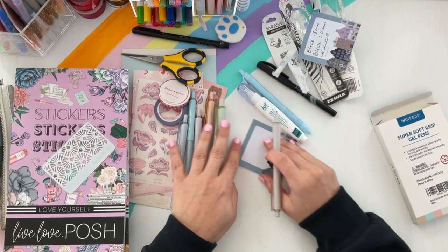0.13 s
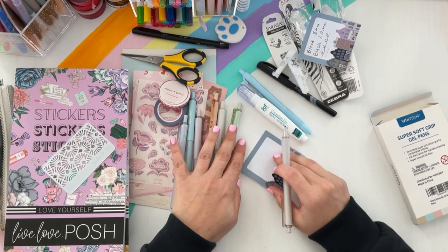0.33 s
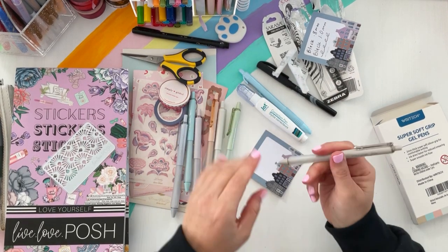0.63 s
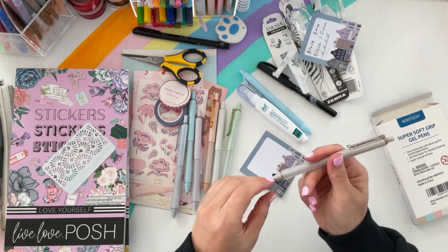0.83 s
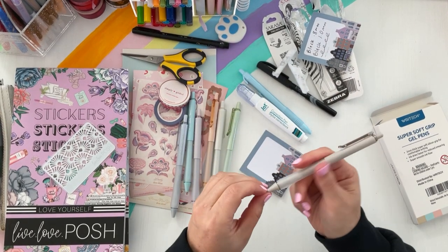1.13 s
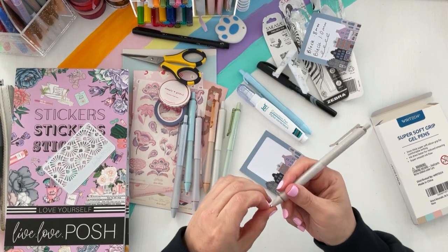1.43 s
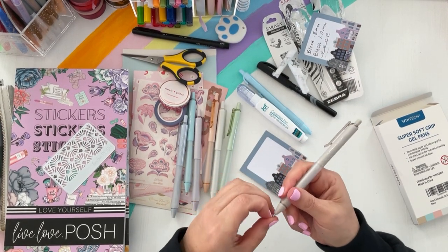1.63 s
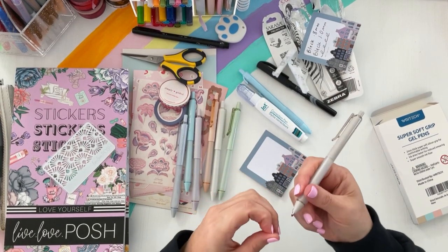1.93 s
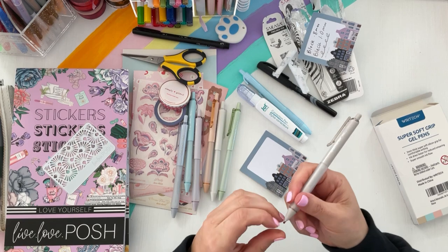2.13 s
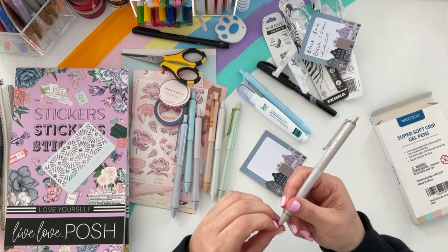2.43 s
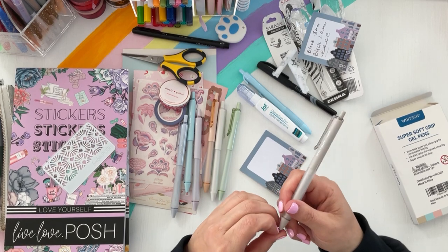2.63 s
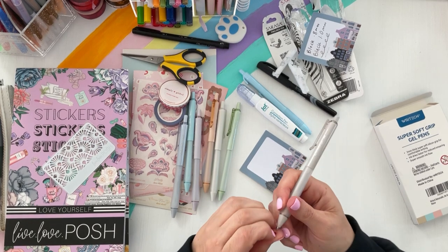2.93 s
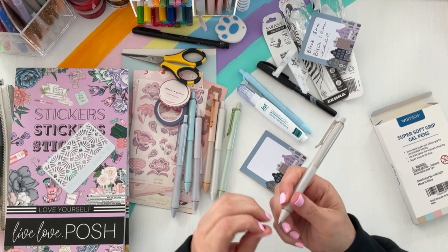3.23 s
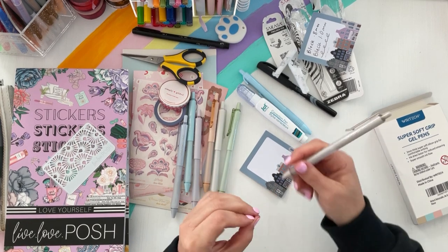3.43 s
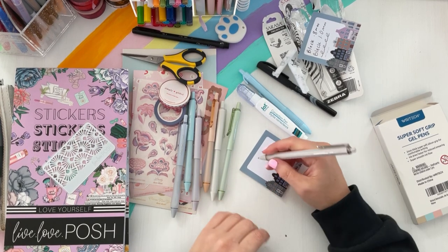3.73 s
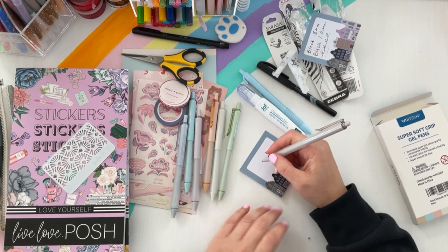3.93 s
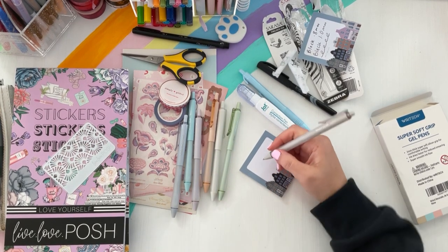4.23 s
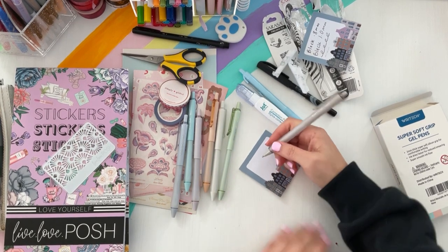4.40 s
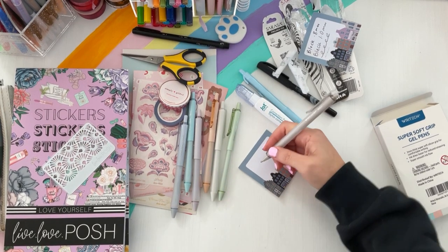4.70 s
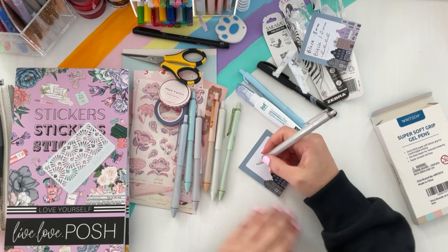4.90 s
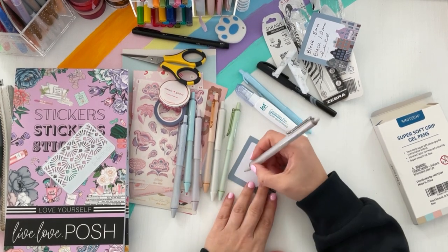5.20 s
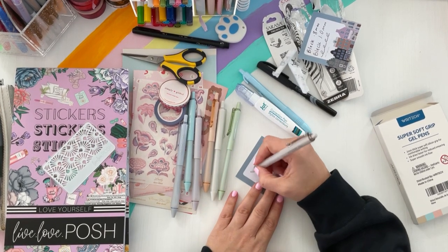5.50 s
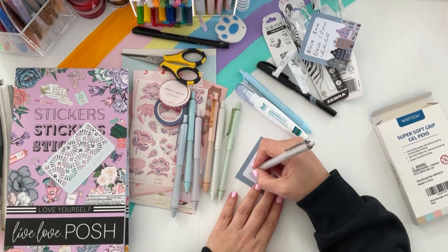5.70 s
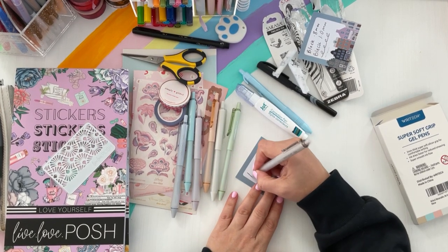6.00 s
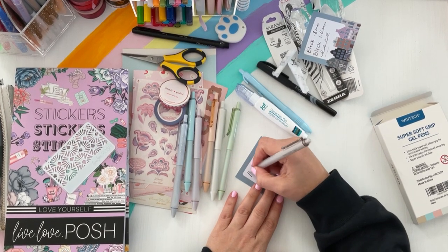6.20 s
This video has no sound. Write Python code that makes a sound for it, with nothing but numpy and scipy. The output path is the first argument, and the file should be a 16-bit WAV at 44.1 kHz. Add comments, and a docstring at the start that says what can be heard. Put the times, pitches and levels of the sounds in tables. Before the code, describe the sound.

Close, dry perspective at a desk in a quiet small room. First a burst of hard plastic rattling, loudest at the start, with desk knocks beneath. Afterwards come faint isolated ticks from fingers on the pen barrel, light paper rustle and padded wrist bumps. Two or three crisp hissing scratches follow on paper, then pressed low rubbing and one crisp click, over faint low room hum.

```python
"""A plastic pen is snatched off a desk with a clatter, then turned and picked at: short contacts ring its barrel.
Knocks ring the desk top. On a small pad the hand slides and the point scratches: grains of noise shaped as paper.
Friction of arm and pen rumbles through the desk modes, and wrist and sleeve add soft low bumps.
Below lies a small quiet room: shaped noise for air and hiss, narrow noise for hum, a gliding sine for a drone."""
import sys
import numpy as np
from scipy import signal
from scipy.fft import rfft, irfft
from scipy.io import wavfile

SR = 44100
rng = np.random.default_rng(int(sys.argv[2]) if len(sys.argv) > 2 else 0)


def volts_from_db(level):
    """Convert decibel levels to linear amplitude ratios."""
    exponent = np.asarray(level, float) / 20
    return 10 ** exponent


def to_wav(s):
    """Save 16-bit WAV."""
    ch = np.atleast_2d(s).T  # columns
    pcm = np.round(np.clip(ch, -1, 1) * 32767)  # PCM
    wavfile.write(sys.argv[1], SR, pcm.astype(np.int16))


N = 280079   # length [samples]
CONTROL = 40   # samples between points of slow control curves


def rms_one(x):
    """Scales to rms 1."""
    return x / np.sqrt(np.mean(x ** 2) + 1e-20)


def from_control(curve):
    """Joins control points with straight lines, up to the full sample rate."""
    return np.interp(np.arange(N) / CONTROL, np.arange(len(curve)), curve)


def drift(rate_hz):
    """Slow random wander of spread 1: noise through two equal low-pass poles."""
    r = np.exp(-2 * np.pi * rate_hz * CONTROL / SR)
    noise = rng.standard_normal(N // CONTROL + 2002)
    slow = signal.lfilter([1], [1, -2 * r, r * r], noise)[2000:]   # skips the filter's run-in
    return from_control(rms_one(slow))


def ring(clicks, hz, t60):
    """A mode: each unit click sets a sine of height 1 ringing, 60 dB down after t60 seconds."""
    r, w = 1000 ** (-1 / (t60 * SR)), 2 * np.pi * hz / SR
    return signal.lfilter([0, np.sin(w)], [1, -2 * r * np.cos(w), r * r], clicks + 1e-18)


def resonance(x, hz, width_hz):
    """Two-pole band-pass with gain 1 at its top."""
    r = np.exp(-np.pi * width_hz / SR)
    top = np.array([1, 0, -1]) * (1 - r * r) / 2
    return signal.lfilter(top, [1, -2 * r * np.cos(2 * np.pi * hz / SR), r * r], x)


def colour(x, spectrum):
    """Filters x by a spectrum drawn over log frequency; rms 1."""
    hz, level_db = np.transpose(spectrum)
    grid = np.fft.rfftfreq(N, 1 / SR) + 1
    gain = volts_from_db(np.interp(np.log(grid), np.log(hz), level_db))
    return rms_one(irfft(rfft(x) * gain, N))


def grains(per_s, spread_db):
    """Random clicks of uneven size and either sign; rms 1."""
    sizes = volts_from_db(spread_db * np.minimum(rng.exponential(1, N), 5)) * rng.choice([-1, 1], N)
    return rms_one(sizes * (rng.random(N) < per_s / SR))


def swells(rows, octaves, shape, dulling):
    """Gains of a table of movements summed in power, one per octave offset, tilted by the last column.
    Each loses 20 dB over its rise or fall, as the power shape of time; dulling is dB per octave per dB lost."""
    peak_s, rise_s, fall_s, peak_db, slope_db = np.transpose(rows)[:, :, None]
    late = np.arange(N // CONTROL + 2) * CONTROL / SR - peak_s
    progress = np.where(late < 0, -late / rise_s, late / fall_s)
    lost_db = np.minimum(20 * progress ** shape, 100)
    gains = []
    for k in octaves:
        level_db = peak_db - lost_db + k * (slope_db - dulling * lost_db)
        power = np.sum(volts_from_db(level_db) ** 2, axis=0)
        gains.append(from_control(np.sqrt(power)))
    return gains


# taps on the pen: (time [s], peak level [dB], brightest pitch [Hz], spread [octaves], chatter decay [ms])
PEN_TAPS = [(.0054, -28.5, 9250, 0.82, .6), (0.013, -32.5, 4430, 0.7, 0.65), (0.1296, -30, 1290, 0.49, 2),
            (0.1507, -30, 5870, 0.78, .6), (0.1549, -20, 9090, 1.3, 1.5), (0.1656, -28, 4815, 0.77, 1),
            (0.182, -25, 8650, 0.34, .8), (0.1856, -19, 4762, 1.5, 1.5), (0.201, -8, 5996, 0.86, .6),
            (0.2017, -1.5, 2113, 0.42, .3), (0.2047, -12, 1452, 0.89, 2.4), (0.2179, -17, 2108, 0.84, 1.8),
            (0.223, -19, 1463, 0.6, 2), (0.23, -18.5, 1318, 0.59, 2.5), (1.1296, -50.5, 4500, .5, 2.4),
            (1.1356, -42, 5150, 0.51, 4), (1.2793, -60.5, 5980, 1.1, .6), (1.5177, -47.5, 4980, 0.48, 4),
            (1.596, -60, 2503, .25, 6.5), (1.766, -56.5, 2500, 0.33, 6.1), (1.7865, -42.5, 3000, 1, 2.2),
            (1.794, -34.5, 5250, 1.16, 0.72), (2.3098, -56, 4220, 0.92, 1), (2.4186, -55, 8460, 0.69, .8),
            (2.848, -54, 9080, 0.83, .6), (2.9036, -30, 5000, 0.83, .9), (2.9058, -26.5, 6200, 0.93, 1.5),
            (2.9157, -30.5, 6480, 0.83, .4), (3.3495, -35.5, 14250, 0.38, 1.3),
            (3.412, -43, 12500, 0.67, .8), (3.4478, -44, 5510, 0.3, 1.2), (3.479, -49, 5500, 0.6, 0.785),
            (3.5157, -51, 12060, .8, 2), (3.6407, -28.5, 7500, 0.91, 1.2), (3.8053, -33, 10380, 1.17, .7),
            (3.8657, -38, 11130, 1.1, .7), (3.8952, -49.5, 6000, 1.04, .5),
            (3.919, -56.5, 7100, 1.02, 0.55), (5.661, -60, 3000, 0.72, .8), (5.907, -58, 1295, 1.63, 0.76),
            (6.0742, -51, 7600, 0.87, .8), (6.1818, -24.5, 8210, 0.51, .7), (6.182, -45, 1320, 0.2, 1.1)]
# modes of the pen barrel: (pitch [Hz], relative level [dB], t60 [s])
PEN_MODES = [(974, 1.5, .012), (1200, -4.5, 0.0084), (1500, -0.5, .01), (2040, -3, 0.007),
             (2270, -0.5, 0.013), (2600, -1.5, .007), (3430, -3, .005), (3720, -1, .005), (4500, -1, 0.014),
             (4995, -2.5, 0.012), (5701, -2, 0.013), (6480, -4, 0.0057), (7600, -2.5, 0.0078),
             (8710, 0, 0.0071), (9846, 3, 0.0042), (10400, 4, 0.0015), (12800, -3.5, 0.0016),
             (14200, -0.5, 0.001), (15600, 3, 0.0038)]


def taps():
    """A tap is a short chatter of contacts that rings the barrel modes near its brightest pitch.
    Returns what the microphone hears directly and what the walls receive."""
    size = 8192
    direct, all_round = np.zeros((2, N + size))
    age = np.arange(32) / 10   # in chatter decay times
    later = age > 0
    for s, peak_db, hz, octaves, chatter_ms in PEN_TAPS:
        strength, jitter = rng.standard_normal((2, 32))
        # the first contact is the firmest, the later ones 0.29 times as strong
        force = np.sign(strength) * np.where(later, 0.29 * np.abs(strength), 1) * np.exp(-age)
        when = (age * chatter_ms * SR / 1000 + np.abs(jitter) * later).astype(int)   # in samples
        contacts = np.zeros(size)
        np.add.at(contacts, when, force)

        barrel = np.zeros(size)
        for k, (mode_hz, mode_db, t60) in enumerate(PEN_MODES):
            distance = np.log2(mode_hz / hz) / octaves
            level_db = mode_db - 3 * distance ** 2 + rng.standard_normal()
            barrel += volts_from_db(level_db) * ring(contacts, mode_hz, t60) * (-1) ** k

        # the contact itself, before any mode speaks, 2.5 dB over the barrel
        crack = resonance(contacts, hz, min(0.78 * hz * octaves, 9000))
        pen = barrel / np.abs(barrel).max() + volts_from_db(2.5) * crack / np.abs(crack).max()
        pen = volts_from_db(peak_db) * pen / np.abs(pen).max()

        # summed over all directions the peaks and dips even out; same energy as the direct sound
        smooth = resonance(np.arange(size) == 0, hz, min(0.87 * hz * octaves, 12000))
        at = round(s * SR)
        direct[at:at + size] += pen
        all_round[at:at + size] += smooth * np.sqrt(np.sum(pen ** 2) / np.sum(smooth ** 2))
    return direct[:N], all_round[:N]


# strokes of skin or pen point on paper:
# (peak time [s], rise [s], fall [s], peak level before flicker [dB], brightness [dB per octave])
PAPER_STROKES = [(.02, .3, 0.49, -49, -1), (.19, .15, .05, -46, -4.5), (.645, 0.068, 0.21, -67.5, 1),
                 (.74, .15, .12, -68, -2.5), (1.775, .03, 0.083, -65, -1), (3.448, 0.021, .02, -55, -2.2),
                 (3.47, 0.11, 0.3, -65.5, -0.2), (3.62, 0.29, 0.11, -63, -3), (3.68, .05, 0.17, -66, -0.3),
                 (3.79, 0.072, .08, -70, 1.4), (3.99, 0.087, 0.12, -63, -1.5), (4.05, .04, 0.096, -48, 0.8),
                 (4.105, 0.096, 0.13, -42.5, -0.37), (4.2, .12, 0.079, -51.5, -0.2),
                 (4.36, 0.42, 0.17, -71.5, 0.3), (4.578, 0.068, 0.091, -40, 0.6),
                 (4.85, 0.092, 0.35, -61.5, 0.03), (5.0, 0.29, 0.19, -62.5, -0.1),
                 (5.075, 0.11, 0.09, -54.5, -0.3), (5.14, .08, .045, -65, -2.3),
                 (5.29, 0.053, 0.12, -65, 2.5), (5.35, .12, 0.048, -60, 0.28),
                 (5.998, 0.041, 0.034, -49.5, -5), (6.024, 0.029, 0.046, -56.5, -4.5),
                 (6.226, .03, 0.043, -56, -5), (6.255, .04, 0.033, -57.5, -4.5)]
# spectrum of the paper fibres: (frequency [Hz], relative level [dB per Hz])
PAPER_SPECTRUM = [(290, -43.5), (500, -10.5), (660, -20), (1240, -5), (1760, -4), (1950, -3), (2430, -4.5),
                  (3550, -1.5), (13200, -9.5), (15800, -15), (16500, -43)]
# pitches the sheet favours: (pitch [Hz], width [Hz], level before a 3.5 dB cut [dB])
SHEET_PEAKS = [(1810, 230, -7.5), (2560, 200, -6.5), (3400, 350, -6.5), (4250, 380, -5.5)]
# resonances of the refill: (pitch [Hz], width [Hz], level added to the sheet [dB])
REFILL_MODES = [(1337, 270, 6), (3210, 89, 2), (4430, 125, -1), (5430, 200, 4), (7500, 300, 6)]


def rubbing():
    """Paper fibres catch by the thousand; the sheet favours a few pitches and brightens with the stroke."""
    snags = grains(20000, spread_db=3.0) + .4 * grains(700, spread_db=3.0)   # fine fibres, coarser snags
    fibres = colour(snags, PAPER_SPECTRUM)
    peaks = sum(volts_from_db(db - 3.5) * resonance(fibres, hz, width) for hz, width, db in SHEET_PEAKS)
    spectrum = rfft(rms_one(fibres + peaks))

    octave = np.clip(np.log2(np.fft.rfftfreq(N, 1 / SR) / 3200 + 1e-9), -2, 2)   # from 3200 Hz
    gains = swells(PAPER_STROKES, np.arange(5) - .5, shape=1.7, dulling=.05)
    sheet = np.zeros(N)
    for k, gain in zip(range(-2, 3), gains):
        weight = np.clip(1 - np.abs(octave - k), 0, 1)   # overlapping octaves that sum to one
        sheet += irfft(spectrum * weight, N) * gain * volts_from_db(0.62 * drift(27))
    sheet *= volts_from_db(.6 * drift(34))

    firm_from_s = 5.9   # from here the point is pressed hard and makes the refill sing
    point = sheet * (np.arange(N) / SR > firm_from_s)
    return sheet + sum(volts_from_db(db) * resonance(point, hz, width) for hz, width, db in REFILL_MODES)


# knocks of pen or knuckle on the desk top: (time [s], peak level [dB])
DESK_KNOCKS = [(0.1298, -33.5), (.1509, -29.5), (0.1551, -30), (0.2019, -28), (.223, -37), (.23, -43),
               (1.7858, -54), (1.794, -51.5), (2.9039, -64), (3.6404, -61.5), (5.661, -62), (5.907, -56.5),
               (6.1814, -48.5)]
# modes of the desk top, for knocks and dragging:
# (pitch [Hz], relative level [dB], t60 when dragged [s]; knocks ring 0.66 times as long)
DESK_MODES = [(90, -8.5, .12), (135, -4.5, 0.13), (205, -3.5, 0.15), (263.4, -1, 0.13), (354.3, 3.5, 0.068),
              (477, -4.5, 0.069), (585, -4.5, 0.038), (816.3, -7, 0.047), (1035, -12, .1),
              (1330, -13, 0.014), (1750, -18.5, .03)]


def knocks():
    """A short push rings every desk mode with a strength of its own."""
    size = 8192
    out, push = np.zeros(N + size), np.zeros(size)
    push[:24] = np.hanning(24)
    push = signal.lfilter(*signal.butter(2, 150, "high", fs=SR), push)   # the board radiates little deep bass
    for s, knock_db in DESK_KNOCKS:
        desk = np.zeros(size)
        for k, (hz, db, t60) in enumerate(DESK_MODES):
            level_db = db + 2 * rng.standard_normal() + 2.9 * np.log2(hz / 300)
            desk += volts_from_db(level_db) * ring(push, hz, 0.66 * t60) * (-1) ** k
        at = round(s * SR)
        out[at:at + size] += volts_from_db(knock_db) * desk / np.abs(desk).max()
    return out[:N]


# pushes and drags of arm and pen on the desk:
# (peak time [s], rise [s], fall [s], peak level before mode levels and a 9 dB cut [dB],
#  hardness [dB per octave])
DESK_DRAGS = [(.1, 0.42, .5, -64, -0.8), (.75, 0.18, 0.14, -64, -7.5), (1.63, .14, .04, -63.5, -4),
              (1.79, .025, 0.067, -59, -1.1), (2.23, .12, .09, -62.5, -3), (2.44, .25, 0.058, -59.5, -4),
              (2.56, 0.16, .12, -59.5, -6), (2.7, .15, .2, -64, -4.5), (2.9, 0.16, .5, -69.5, -2),
              (3.45, .04, 0.28, -63, -0.3), (3.69, 0.1, .14, -63, -2), (3.82, 0.072, 0.16, -63.5, -3),
              (4.03, .1, 0.19, -65, -4.5), (4.18, 0.27, 0.19, -59, -0.6), (4.42, .07, .13, -66, -5.5),
              (4.6, 0.16, 0.15, -58.5, 0), (5.0, 0.51, 0.49, -57, 0.5), (5.67, .1, .06, -55.5, 0.8),
              (5.79, 0.11, .25, -57.5, 0.5), (5.9, 0.28, 0.14, -53.5, -3), (5.996, .09, 0.18, -44.5, -0.8),
              (6.19, 0.036, .035, -50, -6), (6.231, 0.033, .06, -47.5, 3), (6.26, 0.033, 0.079, -48.5, 1)]


def dragging():
    """Friction under arm and pen shakes the desk modes; a harder contact reaches the higher ones."""
    octaves = [np.log2(hz / 300) for hz, db, t60 in DESK_MODES]
    gains = swells(DESK_DRAGS, octaves, shape=1.5, dulling=.05)
    resting = volts_from_db(-74 + 2.5 * drift(4.0))   # the arm's constant light contact, before the 9 dB cut
    resting_hardness = -1.2   # dB per octave
    judder = volts_from_db(2.7 * drift(30))
    out = np.zeros(N)
    for (hz, db, t60), k, moving in zip(DESK_MODES, octaves, gains):
        contact = np.hypot(moving, resting * volts_from_db(resting_hardness * k))
        mode = rms_one(ring(judder * grains(2500, spread_db=1.5), hz, t60))
        out += volts_from_db(db - 9.0) * contact * mode
    return out


# soft bumps of wrist and sleeve on the desk:
# (time [s], peak level [dB], pitch [Hz], length between the 1/e points [s])
SOFT_BUMPS = [(0.759, -60, 129.7, 0.15), (1.617, -59, 242, 0.049), (1.815, -56.5, 110, 0.037),
              (4.04, -51, 115, 0.032), (4.42, -63.5, 273, 0.052), (5.995, -43, 260.7, 0.039)]


def bumps():
    """A padded contact swells and fades on one low pitch."""
    t = np.arange(N) / SR
    out = np.zeros(N)
    for s, db, hz, length in SOFT_BUMPS:
        out += volts_from_db(db) * np.exp(-(2 * (t - s) / length) ** 2) * np.sin(2 * np.pi * hz * t)
    return out


# reverberation of the room: (frequency [Hz], t60 [s], relative level [dB])
ROOM_DECAY = [(150, 0.27, -3), (501.3, 0.51, -0.5), (1140, 0.37, 2.5), (3000, 0.24, -3.5),
              (8000, 0.31, -1.5), (15000, .17, -1)]


def room(x):
    """Dense reflections: noise in half-octave steps, each dying at its own rate, after a short gap."""
    t = np.arange(SR // 2) / SR
    hz, t60s, levels_db = np.transpose(ROOM_DECAY)
    onset = np.clip((t - .003) / 0.0058, 0, 1)   # 3 ms gap, then a 5.8 ms rise
    edges, tail = np.geomspace(100, 18000, 16), np.zeros(len(t))
    for low, high in zip(edges, edges[1:]):
        centre = np.log(low * high) / 2
        t60 = np.interp(centre, np.log(hz), t60s)
        level_db = np.interp(centre, np.log(hz), levels_db)
        band_pass = signal.butter(2, [low, high], "band", fs=SR, output="sos")
        band = signal.sosfilt(band_pass, rng.standard_normal(len(t)))
        tail += volts_from_db(level_db) * band * 1000 ** (-t / t60) * onset
    return signal.fftconvolve(x, tail / np.sqrt(np.sum(tail ** 2)))[:N]


# swells of a low drone: (peak time [s], rise [s], fall [s], peak rms level before wander [dB], pitch [Hz])
DRONE_SWELLS = [(.25, .6, 0.28, -74, 88), (.72, .4, .4, -76.5, 84), (1.6, 0.51, .9, -77, 82),
                (2.58, 0.33, 0.19, -58.5, 80.4), (2.95, .4, 0.23, -70.5, 64), (3.4, .35, 0.98, -74, 61),
                (4.4, 1.5, 0.31, -68.5, 60.3), (4.9, 0.37, 0.34, -77.5, 60), (5.4, 0.24, .5, -79, 70),
                (5.68, .25, 0.15, -68.5, 69.4), (5.96, .2, .5, -64.5, 84), (6.3, .4, .4, -66.5, 78)]


def drone():
    """A sine whose pitch glides from one swell to the next, over a faint constant bed."""
    hz = np.interp(np.arange(N) / SR, *np.transpose(DRONE_SWELLS)[[0, 4]])
    swell = swells(DRONE_SWELLS, [0], shape=1.2, dulling=0)[0]   # octave 0: the pitch column adds no tilt
    gain = np.hypot(swell, volts_from_db(-82.5)) * volts_from_db(0.72 * drift(6.0))
    return np.sqrt(2) * gain * np.sin(2 * np.pi * np.cumsum(hz) / SR)


# wavering hum lines: (pitch [Hz], width of each of two filter passes [Hz], rms level [dB])
HUM_LINES = [(118, 13, -77), (231, 12, -81.5), (344, 48, -80.5), (606, 20, -89)]


def hum():
    """Each hum line is noise passed twice through a narrow resonance, so that it wavers."""
    out = np.zeros(N)
    for hz, width, db in HUM_LINES:
        once = resonance(rng.standard_normal(N), hz, width)
        out += volts_from_db(db) * rms_one(resonance(once, hz, width))
    return out


# spectrum of room air and microphone hiss: (frequency [Hz], relative level [dB per Hz])
AIR_SPECTRUM = [(15, -44.5), (25, -16.5), (87, -4), (128, -1.5), (192, -7.5), (288, -8.5), (349, -1),
                (445, -15), (726, -21), (1030, -15.5), (1470, -21), (5420, -20), (13300, -24.5),
                (15200, -29), (16500, -45.5)]


def room_air():
    """Room air and microphone hiss: steady noise given one broad spectrum."""
    return volts_from_db(-71.5) * colour(rng.standard_normal(N), AIR_SPECTRUM)


def scene():
    """Pen, paper and desk in the room, over its hum."""
    direct, all_round = taps()
    contact = rubbing() + knocks()
    reverberant = volts_from_db(-14) * room(all_round + contact)
    background = drone() + hum() + room_air()
    return (direct + contact + reverberant + dragging() + bumps() + background)[None]


def low_pass(x):
    """Removes everything above the highest recorded frequency."""
    return signal.sosfilt(signal.butter(12, 17010, fs=SR, output="sos"), x)


def record(dry):
    """The microphone cuts the deepest bass, below 52 Hz."""
    bass_cut = signal.butter(8, 52, "high", fs=SR, output="sos")
    return low_pass(signal.sosfilt(bass_cut, dry))


dry = scene()
out = record(dry)
to_wav(out)
```